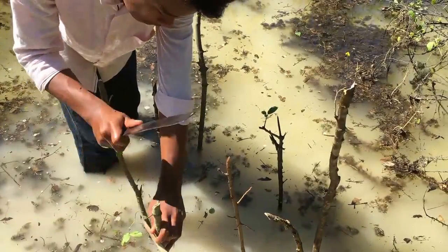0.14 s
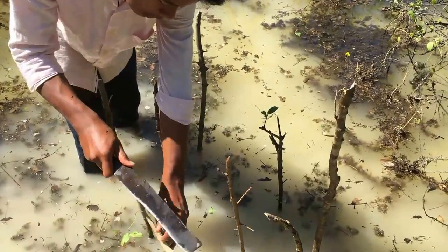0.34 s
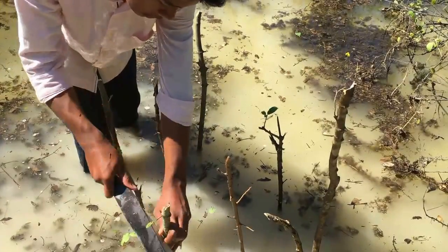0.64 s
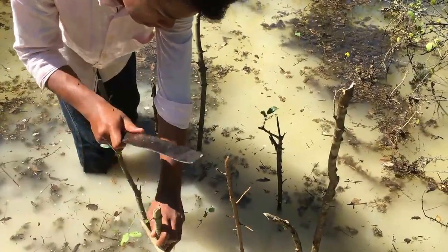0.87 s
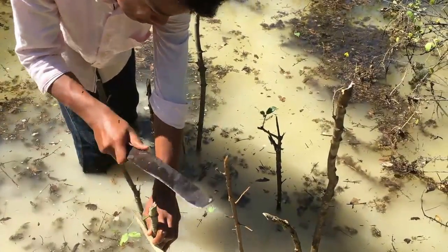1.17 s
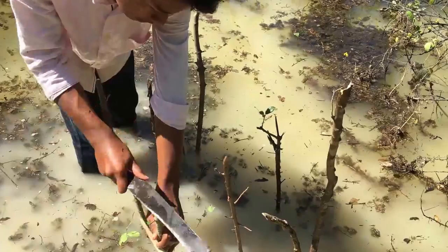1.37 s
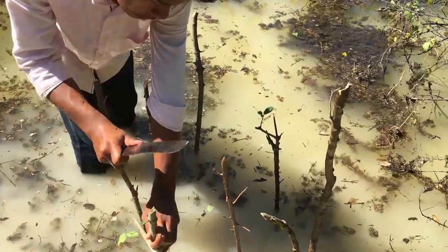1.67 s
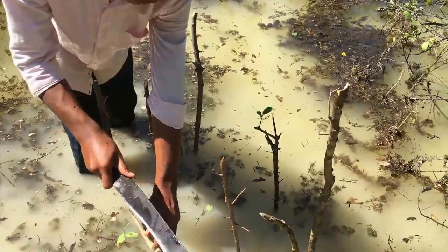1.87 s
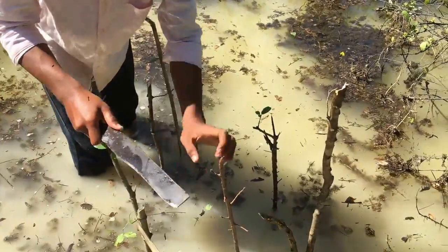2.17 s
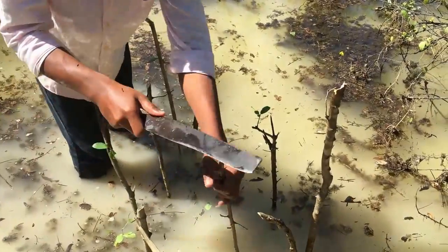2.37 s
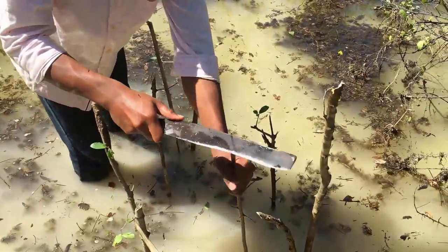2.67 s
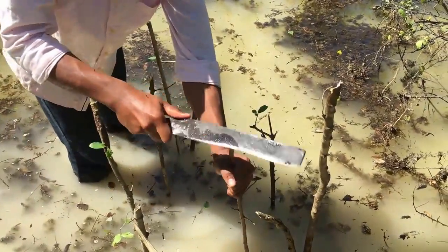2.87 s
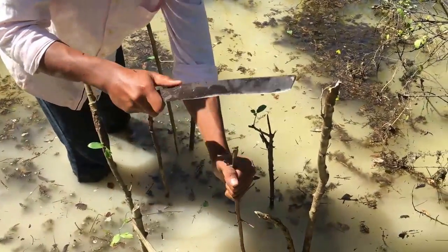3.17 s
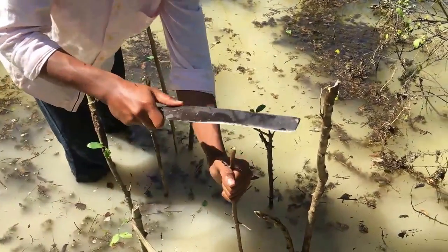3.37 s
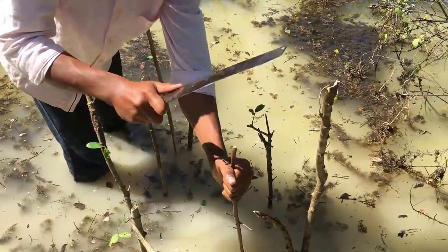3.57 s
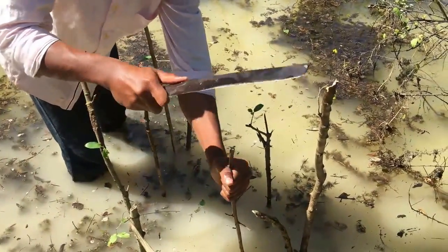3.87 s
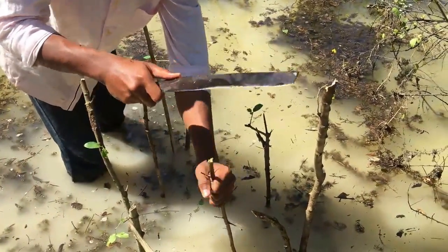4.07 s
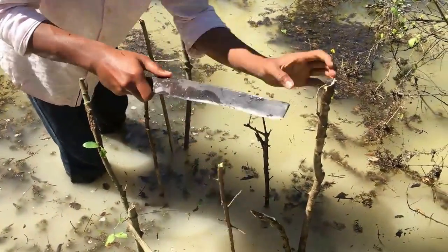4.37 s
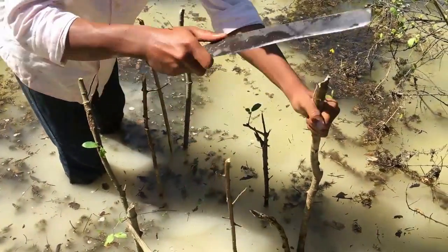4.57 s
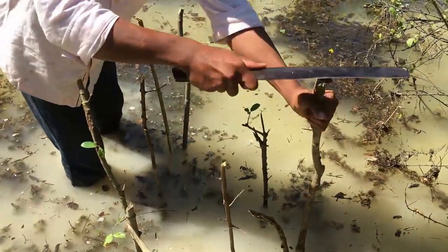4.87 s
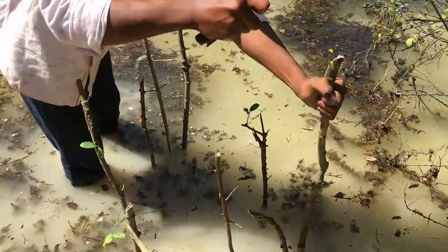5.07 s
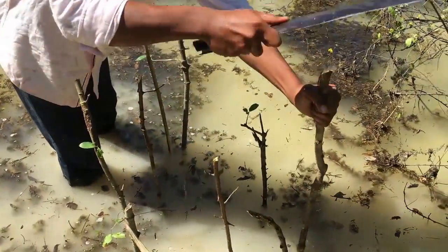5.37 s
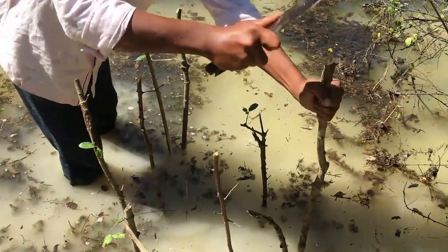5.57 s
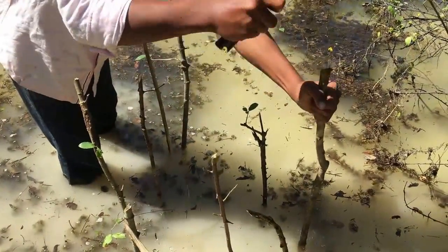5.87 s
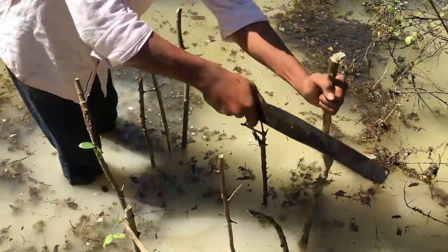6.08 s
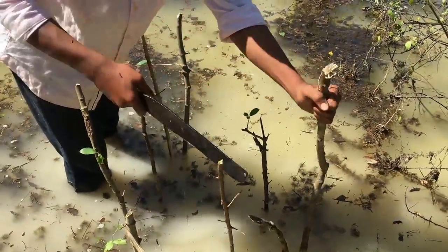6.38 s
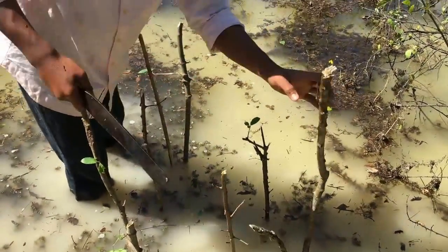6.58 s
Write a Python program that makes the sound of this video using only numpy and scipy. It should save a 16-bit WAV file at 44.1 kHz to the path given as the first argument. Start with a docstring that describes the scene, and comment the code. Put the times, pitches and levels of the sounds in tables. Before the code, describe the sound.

Outdoors, about a metre away, six hard machete chops land on a wooden stake in steady succession, the blade ringing briefly each time. Six softer cuts follow, scattered at first and then more regular, with wet fibres tearing and squeaking against the steel. A distant low drone continues throughout, while twigs and sleeves barely rustle and insects and a bird are only just audible.

```python
"""Machete on stakes in shallow water

One microphone, about a metre from stakes standing in muddy water. Six hard blows knock a stick
and ring the steel blade; six lighter cuts go into wet wood, which splinters and squeaks.
Twigs and sleeves rustle faintly close by. Far off lie a low drone, insects and a faint bird.
A thin hiss comes and goes behind the hard blows."""
import sys
import numpy as np
from scipy import signal
from scipy.fft import rfft, irfft
from scipy.io import wavfile
from scipy.ndimage import uniform_filter1d, minimum_filter1d

SR = 44100
rng = np.random.default_rng(int(sys.argv[2]) if len(sys.argv) > 2 else 0)


def unload_audio(sound):
    """Save the sound as a 16-bit wav file, at the path given as the first command line argument."""
    columns = np.transpose(np.atleast_2d(sound))
    # keep every value between -1 and 1, then stretch to whole-number steps
    steps = np.round(np.clip(columns, -1, 1) * 32767)
    wavfile.write(sys.argv[1], SR, steps.astype(np.int16))


N = 296793
HIT_SAMPLES = 16384
T = np.arange(N) / SR
AGE = np.arange(HIT_SAMPLES) / SR  # seconds since a sound began

# slow course of the distant rumble: (time [s], drone level [dB], bass level [dB])
RUMBLE_LEVELS = [(0, -43.5, -57), (1.401, -47, -61), (2.1, -43, -57.5), (2.6, -45.5, -49),
                 (3.2, -42.5, -55), (4.1, -46.5, -54), (4.6, -49.5, -55.5), (5.4, -49, -54),
                 (5.9, -49, -48), (6.73, -45, -47)]
# spectrum of the open air: (frequency [Hz], level [dB])
AIR_SPECTRUM = [(20, -44), (60, -6.5), (110, -7.5), (230, -18.5), (420, -34), (730, -41.5), (1100, -35),
                (1750, -38), (2600, -48.5), (3800, -50), (4800, -55.5), (9500, -59.5), (10500, -61.5),
                (16000, -59.5)]
# slow course of the insects: (time [s], level [dB])
INSECT_LEVELS = [(0, -84), (1.5, -85), (2.5, -90), (3.7, -88.5), (4.3, -81.5), (6.73, -84)]
# stretches of thin hiss: (start [s], end [s], level [dB])
HISS_SPANS = [(0, 1.2, -65), (1.55, 2.36, -64.5)]
# spectrum of the hiss: (frequency [Hz], level [dB])
HISS_SPECTRUM = [(500, -3.5), (2000, -0.5), (5000, -3), (9000, -4.5), (10300, -7.5), (16000, -11.5)]
# machete blows: (time [s], knock [dB], stick pitch [ratio], crack [dB], brightness [dB/octave],
# bite length [s], blade ring [dB], place along the blade [units from the middle])
BLOWS = [ (0.05, -4, 0.97, -13.5, -0.1, 0.0052, 0, 0.7), (0.421, -3, 0.97, -11.5, -1.5, 0.0036, -5, 0.94),
         (0.7984, -2.5, 0.97, -13, 0.5, 0.0064, 2.5, -0.47),
         (1.2138, -5.5, 0.98, -16, -4, 0.0048, -1.5, -0.4),
         (1.579, -4, 0.95, -10.5, -0.8, 0.0041, 0, -1.13), (1.9464, -3, 0.98, -11.5, -2, 0.0022, 0, -.15),
         (3.096, -36, .85, -39, 4.5, 0.004, -33, 0), (3.8689, -31, 0.61, -42.5, 5, 0.004, -23, -1.04),
         (5.026, -32.5, 0.762, -27, 9, 0.0074, -30.5, -0.5),
         (5.428, -43, 0.65, -30, 4, 0.0069, -23.5, -0.4),
         (5.8145, -23.5, 0.75, -21.5, 4.5, 0.0026, -23.5, 1.4),
         (6.2209, -28, 0.97, -21.5, 2, 0.0047, -27, 3)]
# dead resonances of the struck stick: (frequency [Hz], level [dB], time to peak [s])
STICK_MODES = [(921, -13, 0.0028), (1127, -18.5, 0.0018), (1616, -11.5, 0.0011), (1974, -7.5, 0.0048),
               (2216, -10, .0019), (2687, -17, 0.0031), (3390, -23, .0015), (5196, -22.5, 0.0019)]
# bending of the whole stake: (frequency [Hz], level [dB], time to peak [s])
STAKE_MODES = [(206, -7.5, 0.0022), (283, -3.5, 0.0027), (555.6, -11.5, .002)]
# spectrum of breaking fibres: (frequency [Hz], level [dB])
CRACK_SPECTRUM = [(60, -50.5), (180, -11), (400, -16.5), (520, -6.5), (680, -19), (1200, -0.5), (1900, 5.5),
                  (2400, -8), (2950, -10.5), (3250, 2), (5200, -3.5), (5700, -9), (9000, -17.5),
                  (11000, -20.5), (16000, -21.5)]
# sound scattered back by water and bushes: (frequency [Hz], level [dB])
SCATTER_SPECTRUM = [(60, -45), (180, -2), (350, 0.5), (600, -11), (1000, -4), (1700, 8.5), (2600, -9),
                    (3200, -3), (4000, -4.5), (4900, -10.5), (6500, -11.5), (10000, -18), (16000, -25.5)]
# steel blade, damped by the hand: (frequency [Hz], level [dB], t60 [s], gain [dB/unit of place])
BLADE_MODES = [(357.5, -31, 0.17, -1.5), (750, -36, 0.2, 0.5), (970, -31.5, .09, -5),
               (1305.7, -19.5, 0.16, 1.5), (1482.5, -16.5, 0.22, -5), (1636, -13.5, .085, -1),
               (1680.6, -13, 0.11, 6), (1943, -15, 0.09, 4), (2094, -22, .08, 4), (2182, -24.5, .04, -2.5),
               (2770, -29, 0.1, 3), (2806, -33.5, 0.14, 1.5), (3089, -35.5, .08, 1),
               (3223, -39.5, 0.17, 1.5), (3570, -36.5, 0.03, -2.5), (3920, -32.5, .12, 3.5),
               (4070, -37, .13, 0), (4592, -34, 0.065, 0.5), (5280, -35.5, 0.1, 2.5),
               (6255, -40.5, 0.1, -2.5), (6494, -41.5, .09, 2.5), (7650, -48, 0.1, 1),
               (13386, -55.5, .16, 8)]
# sleeve and hand brushing the stakes: (time [s], length [s], level [dB])
BRUSHES = [(2.76, 0.089, -70.5), (4.26, 0.1, -72.5), (4.682, 0.076, -72.5)]
# cuts that tear on along the grain: (time [s], length [s], typical starting level [dB])
TEARS = [(3.109, 0.044, -47), (3.889, 0.12, -45.5), (5.45, 0.043, -42.5), (5.836, 0.075, -40)]
# single snaps of a chip or twig: (time [s], level [dB], centre [Hz])
SNAPS = [(1.179, -48.5, 4500), (2.248, -55.5, 4300), (3.55, -66.5, 13000), (3.932, -47, 4000),
         (3.94, -43, 4200), (5.132, -61, 5000), (5.501, -47, 3280), (5.664, -60.5, 9000),
         (5.863, -32.5, 8000)]
# wet wood squeaking on steel: (time [s], length [s], start pitch [Hz], end pitch [Hz], level [dB])
SQUEAKS = [(3.111, 0.0053, 1744, 1500, -34), (3.173, 0.0062, 1850, 2090, -51.5),
           (3.898, .009, 2940, 2340, -44), (3.912, 0.024, 2053, 1423, -35.5),
           (5.454, 0.012, 4400, 3200, -36), (5.84, 0.0092, 1410, 847, -36.5),
           (5.841, 0.011, 2400, 1885, -36.5), (5.845, 0.0126, 4400, 3260, -40),
           (5.859, 0.0097, 1134, 935, -33), (5.882, 0.032, 1130, 1770, -47)]
# distant bird: (time [s], length [s], start pitch [Hz], end pitch [Hz], relative level [dB])
BIRD_NOTES = [(3.3, .35, 3920, 3960, -78), (4.23, 0.21, 3980, 4020, -74), (5.933, 0.068, 4100, 4100, -71),
              (6.561, 0.12, 3580, 4020, -64.5)]


def undb(db):
    """Decibels to gain."""
    return 10 ** (np.asarray(db) / 20)


def fade(t60):
    """Free decay, 60 dB in t60 seconds."""
    return np.exp(-np.log(1000) * AGE / t60)


def onset(rise_s):
    """A smooth rise from silence to 1."""
    return 1 - np.exp(-AGE / rise_s)


def bite(length_s, release_s, rise_s):
    """Force while the edge advances, then a quick release."""
    return np.exp(-np.maximum(AGE - length_s, 0) / release_s) * onset(rise_s)


def swell(peak_s):
    """A push that builds to its peak and dies quickly."""
    return AGE / peak_s * np.exp(1 - AGE / peak_s)


def shaped(x, envelope):
    """Lay an envelope on x, with rms 1 under its top."""
    return x * envelope * np.sqrt(np.sum(envelope ** 2) / np.sum((x * envelope) ** 2))


def add(track, s, sound):
    """Mix a sound into the track from time s."""
    start = max(int(s * SR), 0)
    track[start:start + len(sound)] += sound[:N - start]


def colour(x, points, tilt_db=0):
    """Give x a spectrum of (frequency [Hz], level [dB]) points, tilted per octave; rms 1."""
    hz, db = np.transpose(points)
    octave = np.log2(np.maximum(np.arange(len(x) // 2 + 1), 1) * SR / len(x))
    gain = undb(np.interp(octave, np.log2(hz), db) + tilt_db * octave)
    coloured = irfft(rfft(x) * gain, len(x))
    return coloured / np.std(coloured)


def noise(points):
    """Steady noise with the given spectrum; rms 1."""
    return colour(rng.standard_normal(N), points)


def resonate(x, hz, width_hz, passes=1):
    """One resonance; a second pass steepens its skirts."""
    hz = min(hz, SR / 3)
    b, a = signal.iirpeak(hz, hz / min(width_hz, SR / 3), fs=SR)
    for _ in range(passes):
        x = signal.lfilter(b, a, x)
    return x


def walk(per_s):
    """Random drift with a spread of 1."""
    knots = rng.standard_normal(int(N / SR * per_s) + 2)
    drift = np.interp(T * per_s, np.arange(len(knots)), knots)
    return drift / np.std(drift)


def rumble():
    """A far-off drone swells and sinks over a bass that comes in small gusts."""
    times, drone_db, bass_db = np.transpose(RUMBLE_LEVELS)
    drone = noise([(30, -60.5), (60, -14), (75, 4), (88, -16.5), (110, -23.5), (250, -71)])
    bass = noise([(20, -39.5), (38, -7.5), (50, 0), (60, -5), (85, -29.5), (200, -78)])
    gust_db = 2.5 * walk(per_s=6)
    return drone * undb(np.interp(T, times, drone_db)) + bass * undb(np.interp(T, times, bass_db) + gust_db)


def open_air():
    """Soft, low noise all round the microphone, barely wavering."""
    return noise(AIR_SPECTRUM) * undb(-47 + 0.66 * walk(per_s=5))


def insects():
    """A faint, flickering band of insects high in the treble."""
    band = noise([(6000, -48), (7800, -13), (8400, -2), (9000, -7.5), (11000, -50)])
    level_db = np.interp(T, *np.transpose(INSECT_LEVELS))
    return band * undb(level_db + 2 * walk(per_s=25))


def hiss():
    """A thin hiss comes and goes behind the hard blows."""
    gain = sum(undb(db) * ((T >= start) & (T < end)) for start, end, db in HISS_SPANS)
    return noise(HISS_SPECTRUM) * uniform_filter1d(gain, size=800)


def knock(modes, pitch):
    """Heavily damped wood: each mode sounds only while the blade pushes."""
    wood = 0
    for k, (hz, db, peak_s) in enumerate(modes):
        detune = 1 + 0.036 * rng.standard_normal()
        wood += (-1) ** k * undb(db) * swell(peak_s) * np.sin(2 * np.pi * hz * pitch * detune * AGE)
    return wood


def fibres(spread_db):
    """A dense train of tiny snaps of very unequal size."""
    return rng.standard_normal(HIT_SAMPLES) * undb(spread_db * rng.standard_normal(HIT_SAMPLES))


def blade(place, tilt_db):
    """The steel rings; where it lands and how sharply decides which modes are strong."""
    ring = 0
    for hz, db, t60, lean_db in BLADE_MODES:
        detune = 1 + 0.0016 * rng.standard_normal()
        phase = 2 * np.pi * rng.random()
        treble_db = 1.6 * tilt_db * max(np.log2(hz / 2500), 0)
        gain = undb(db + lean_db * place + treble_db)
        ring += gain * fade(t60) * np.sin(2 * np.pi * hz * detune * AGE + phase)
    grip = np.exp(-(AGE / .085) ** 2)  # the cut closes on the blade and damps it ever faster
    return ring * onset(0.0037) * grip


def off_water(x, delay_s, db):
    """The direct sound plus a slightly later copy off the water surface."""
    return x + undb(db) * np.interp(AGE - delay_s, AGE, x, left=0)


def far_echo(x, t60):
    """Distant trees return a late, diffuse copy."""
    response = rng.standard_normal(HIT_SAMPLES) * fade(t60) * onset(0.024)
    return signal.fftconvolve(x, response / np.linalg.norm(response))[:HIT_SAMPLES]


def chops():
    """A metre away, each blow knocks the stick, cracks fibres and rings the blade."""
    out = np.zeros(N)
    for s, knock_db, pitch, crack_db, tilt_db, length, ring_db, place in BLOWS:
        stick = undb(knock_db) * knock(STICK_MODES, pitch)
        # the whole stake bends with the force that cracks the fibres
        thud = undb(crack_db - 7.5) * knock(STAKE_MODES, pitch=1)
        wood = off_water(stick + thud, delay_s=.0062, db=-15.5)
        crack = colour(fibres(spread_db=4.5), CRACK_SPECTRUM, tilt_db)
        crack = shaped(crack, bite(length, release_s=0.0035, rise_s=0.0012))
        scatter = colour(fibres(spread_db=7), SCATTER_SPECTRUM, .8 * tilt_db)
        scatter *= undb(-20.5) * fade(t60=.19) * onset(.004)
        steel = blade(place, tilt_db)
        steel += undb(-38) * far_echo(steel, t60=0.71)
        add(out, s, wood + undb(crack_db) * (crack + scatter) + undb(ring_db) * steel)
    return out


def rustle(ticks_per_s=14):
    """Close by, twigs crackle faintly and sleeves brush past the stakes."""
    out = np.zeros(N)
    for when, pitch, size in rng.random((int(ticks_per_s * N / SR), 3)):
        hz = 3200 * 4 ** pitch
        tick = resonate(fibres(spread_db=7), hz, .35 * hz, passes=2)
        add(out, when * N / SR, undb(-79 + 12 * size ** 3) * shaped(tick, swell(peak_s=0.0017)))
    for s, length, db in BRUSHES:
        cloth = resonate(fibres(spread_db=8), hz=4400, width_hz=4300)
        stroke = np.sin(np.pi * np.minimum(AGE / length, 1))
        add(out, s, undb(db) * shaped(cloth, stroke))
    return out


def splinter(hz, length_s):
    """A small burst of breaking fibres with a short tail."""
    snaps = fibres(spread_db=11)
    body = resonate(snaps, hz, 0.7 * hz, passes=2)
    top = undb(-13.5) * resonate(snaps, hz=12000, width_hz=6000)
    tail = undb(-19.5) * fade(t60=0.14)
    return shaped(body + top, bite(length_s, release_s=0.0018, rise_s=0.0013) + tail)


def slicing(gap_s=.012, centre_hz=4280, slowing_db=-19):
    """The edge tears on in uneven splinters that weaken as it slows; now and then a chip snaps off."""
    out = np.zeros(N)
    for s, length, db in TEARS:
        elapsed = 0
        for gap, size, pitch in rng.standard_normal((32, 3)):
            if elapsed < length:
                gain = undb(db + slowing_db * elapsed / length + 4.1 * size)
                add(out, s + elapsed, gain * splinter(centre_hz * np.exp(.25 * pitch), length_s=0.0049))
            elapsed += gap_s * np.exp(0.43 * gap)
    for s, db, hz in SNAPS:
        add(out, s, undb(db) * splinter(hz, length_s=0.0028))
    return out


def squeaks():
    """Uneven slips excite one narrow resonance, which glides as the edge moves through the wood."""
    out = np.zeros(N)
    for s, length, start_hz, end_hz, db in SQUEAKS:
        progress = np.minimum(AGE / length, 1)
        slips = resonate(fibres(spread_db=3.5), start_hz, start_hz / 4, passes=2)
        pitch_ratio = (end_hz / start_hz) ** progress
        gliding = np.interp(np.cumsum(pitch_ratio) / SR, AGE, slips)
        envelope = np.sin(np.pi * progress) ** 2 + undb(-13.5) * fade(t60=0.16)
        add(out, s, undb(db) * shaped(gliding, envelope))
    return out


def bird():
    """Faint whistles, most rising and levelling off, blurred by distance."""
    out = np.zeros(N)
    for s, length, start_hz, end_hz, db in BIRD_NOTES:
        progress = np.minimum(AGE / length, 1)
        hz = start_hz + (end_hz - start_hz) * np.sin(np.pi / 2 * progress)
        hz += 45 * walk(per_s=520)[:HIT_SAMPLES]
        note = undb(db) * np.sin(np.pi * progress) * np.sin(2 * np.pi * np.cumsum(hz) / SR)
        add(out, s, .8 * note + 0.63 * far_echo(note, t60=0.16))
    return out


def scene():
    """The close work and its background at one microphone."""
    close = chops() + slicing() + squeaks() + rustle()
    background = bird() + rumble() + open_air() + insects() + hiss()
    return (close + background)[None]


def record(dry):
    """The recorder's fast limiter holds down the hardest blows; the very top is cut."""
    ceiling, window_samples, top_hz = .95, 45, 15850
    gain = np.minimum(1, ceiling / (np.abs(dry) + 1e-9))
    gain = uniform_filter1d(minimum_filter1d(gain, window_samples), window_samples)
    lowpass = signal.ellip(10, .2, 80, top_hz, fs=SR, output="sos")
    return signal.sosfilt(lowpass, dry * gain)


dry = scene()
out = record(dry)
unload_audio(out)
```